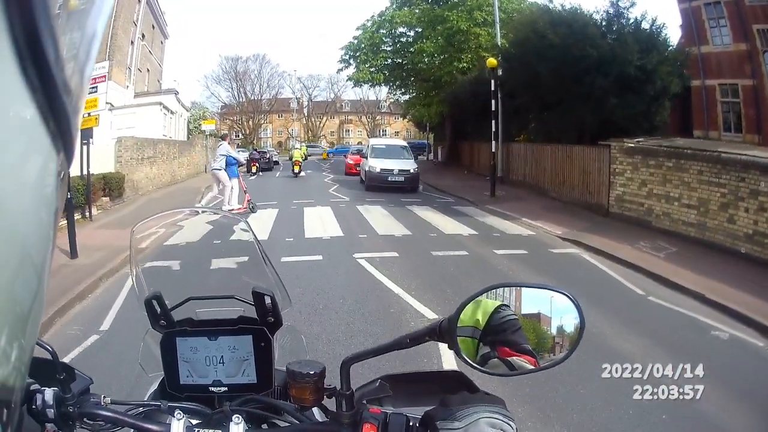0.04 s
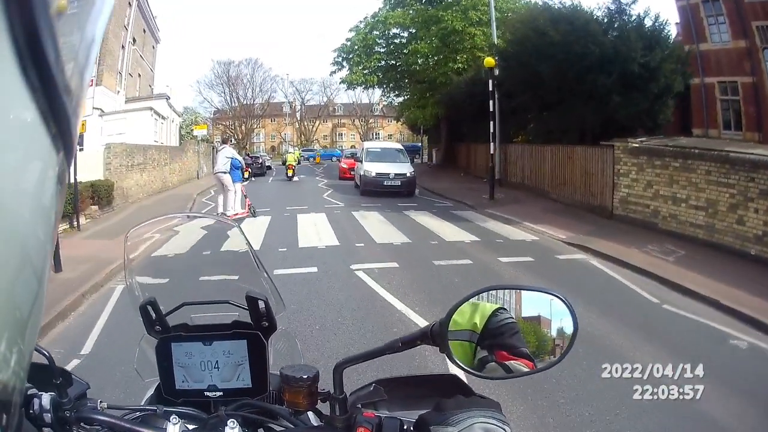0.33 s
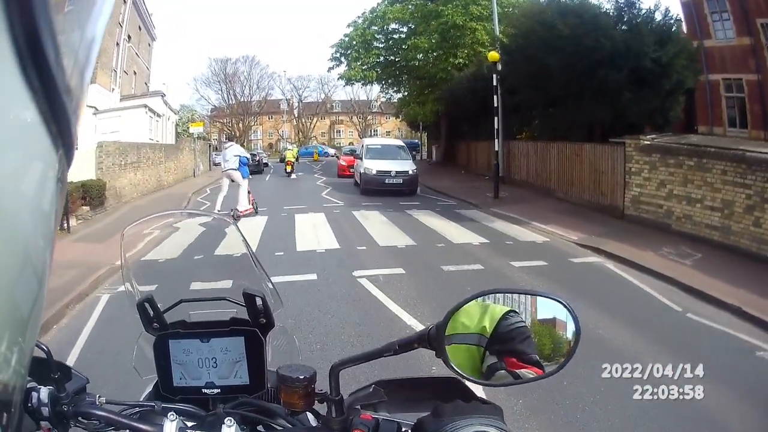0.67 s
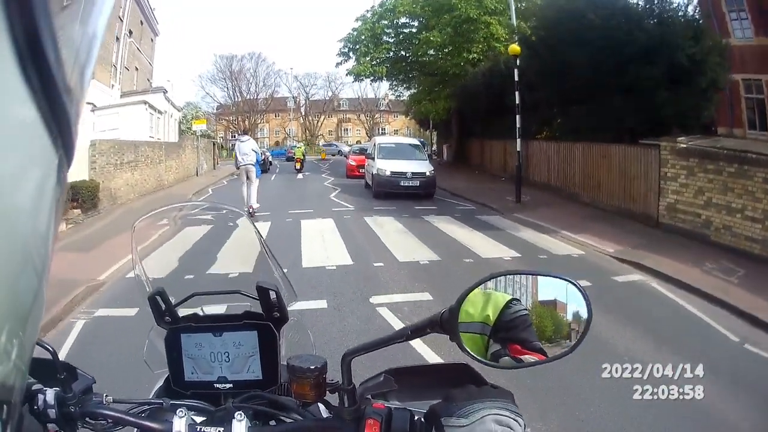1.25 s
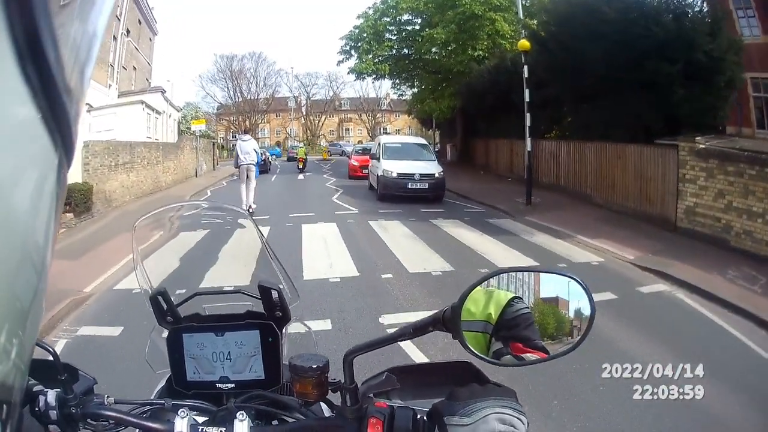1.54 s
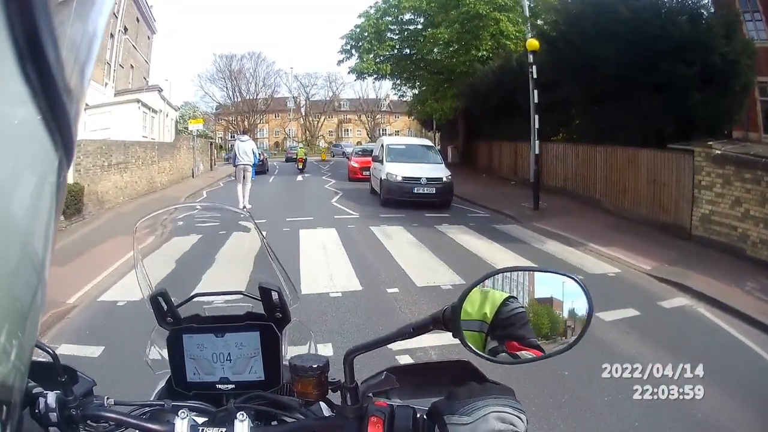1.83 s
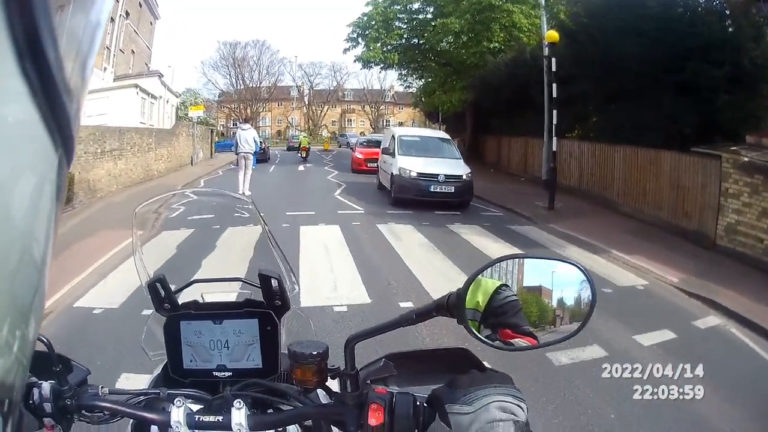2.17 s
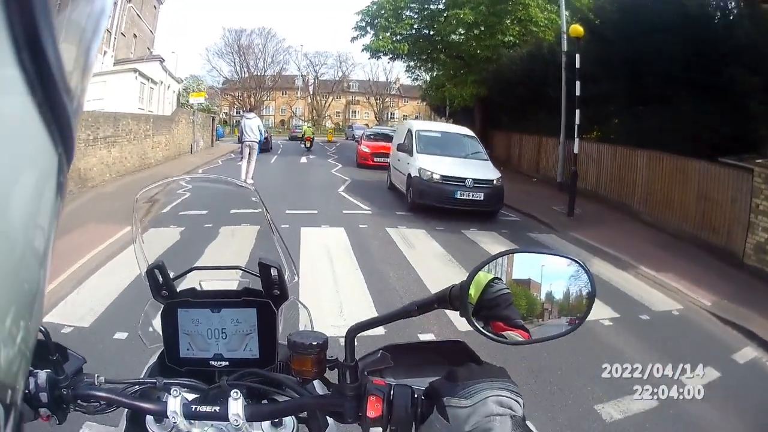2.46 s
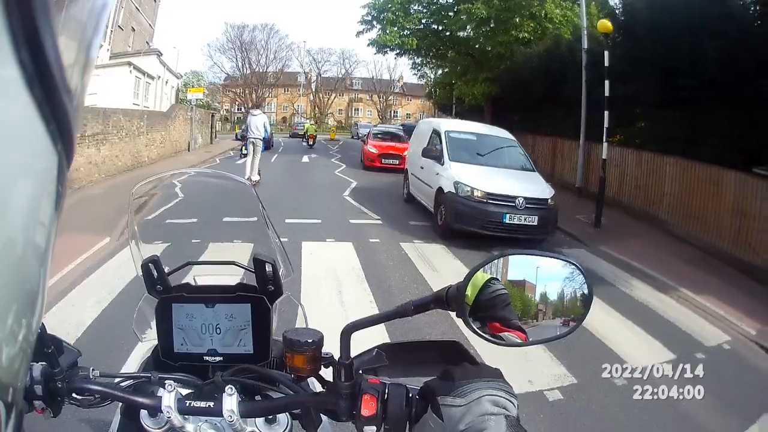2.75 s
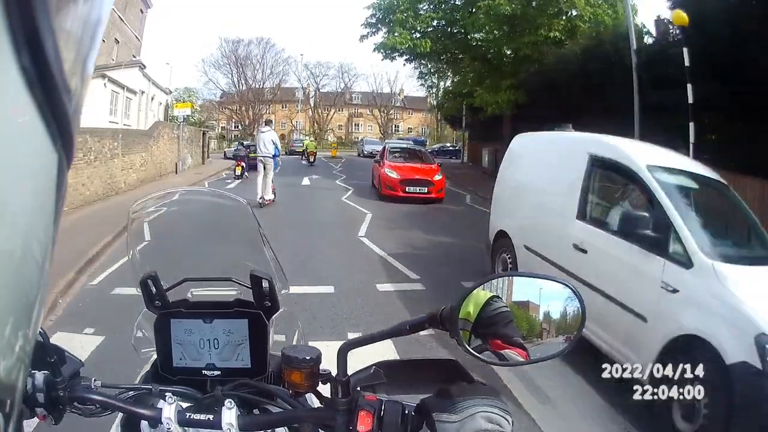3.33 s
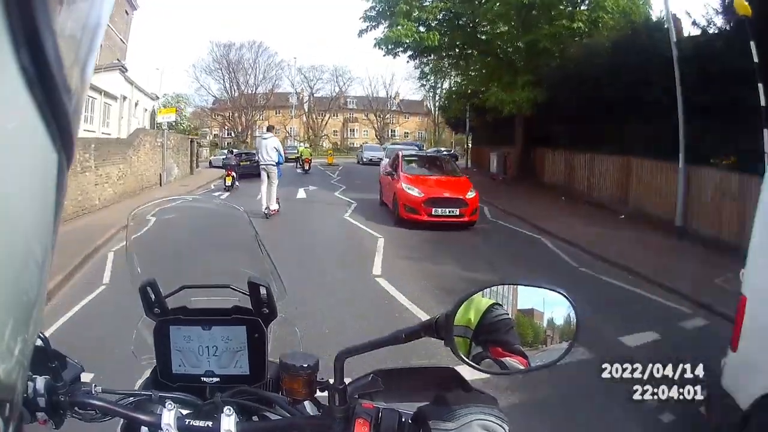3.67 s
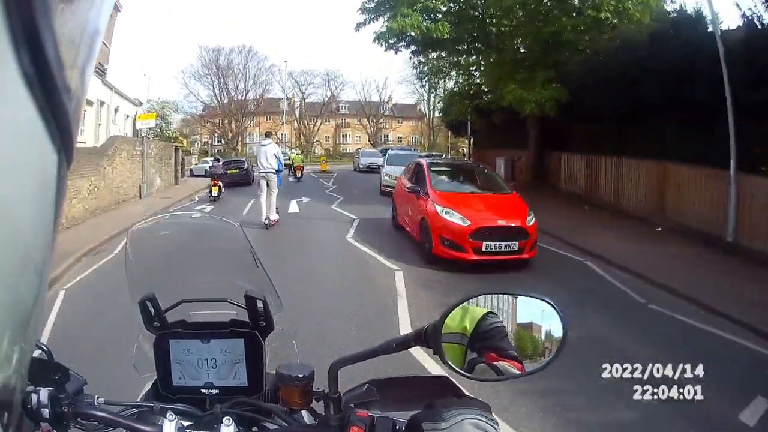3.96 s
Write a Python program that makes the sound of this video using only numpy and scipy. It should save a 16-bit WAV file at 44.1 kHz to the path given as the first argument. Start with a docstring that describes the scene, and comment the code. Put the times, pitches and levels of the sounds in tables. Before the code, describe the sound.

A motorcycle engine, heard from the rider's helmet, idles and then pulls away at about 0.5 seconds, throbbing, rattling and ticking. Its revs peak around 1.2 and 2.6 seconds and climb again at the end. A thin high whistle comes and goes until 2.3 seconds. Dull bumps knock under light, growing wind and road noise. From 3 seconds a van accelerates past with tyre roar and a faint rising whistle.

```python
"""A motorcycle ride through town

A three-cylinder motorcycle pulls away from idle, heard from the rider's helmet. Its uneven
firing throbs in the exhaust while gears whirr, valves tick and a thin whistle comes and goes.
Bumps knock the frame, over light wind and road noise. Near the end an oncoming van
accelerates past with tyre roar and a rising turbo whistle."""
import sys
import numpy as np
from scipy import signal
from scipy.fft import rfft, irfft, next_fast_len
from scipy.io import wavfile
from scipy.ndimage import uniform_filter1d, map_coordinates

SR = 44100
rng = np.random.default_rng(int(sys.argv[2]) if len(sys.argv) > 2 else 0)


def to_wav(sig):
    """Store sig (one row per channel, or 1-D mono) as 16-bit WAV at the path in sys.argv[1].

    Samples outside -1..1 are clipped; the rate is SR.
    """
    pcm = np.clip(np.atleast_2d(sig), -1, 1) * 32767
    pcm = np.round(pcm).astype(np.int16)
    wavfile.write(sys.argv[1], SR, pcm.T)  # frames by channels


N = 176400  # 4 seconds


def amp(db):
    """Turn decibels into a number to multiply by."""
    return 10 ** (np.asarray(db) / 20)


def unit(x):
    """Scale a signal to an average strength (rms) of 1."""
    return x / np.sqrt(np.mean(x ** 2) + 1e-20)


def along(points, hz):
    """Read a table of (pitch_hz, value) rows at any pitch, on a log scale."""
    pitches, values = np.transpose(points)
    return np.interp(np.log(hz + 1), np.log(pitches + 1), values)


def clock():
    """The time of each sample, in seconds."""
    return np.arange(N) / SR


def curves(rows):
    """Join timed rows with straight lines: one curve for each column after the time."""
    times, *columns = np.transpose(rows)
    return [np.interp(clock(), times, column) for column in columns]


def wobble(rate):
    """A smooth random curve through `rate` new values a second."""
    return map_coordinates(rng.standard_normal(N // 8), [clock() * rate + 2], mode="wrap")


def filtered(x, response):
    """Turn each frequency in x up or down by response(hz)."""
    size = next_fast_len(N + 8192)
    return irfft(rfft(x, size) * response(np.fft.rfftfreq(size, 1 / SR)), size)[:N]


def noise(colour):
    """Noise of strength 1; its colour table says which pitches are strong."""
    return unit(filtered(rng.standard_normal(N), lambda hz: amp(along(colour, hz))))


def fuzzy(turns, width_hz):
    """A blurred tone: a narrow band of noise that follows something spinning."""
    angle = 2 * np.pi * turns
    return unit(wobble(width_hz) * np.cos(angle) + wobble(width_hz) * np.sin(angle))


def bump(cycle, place, width):
    """One smooth pulse each cycle; place and width are fractions of the cycle."""
    offset = (cycle - place + .5) % 1 - .5
    return np.exp(-.5 * (offset / width) ** 2)


def patchy(x, depth_db):
    """Make narrow bands of pitch in x swell and fade at random."""
    bands = signal.stft(x, nperseg=1024)[2]
    swells = uniform_filter1d(rng.standard_normal(bands.shape), 3, axis=0)
    swells = uniform_filter1d(swells, 12, axis=1)
    return signal.istft(bands * amp(depth_db * unit(swells)), nperseg=1024)[1][:N]


# Loudness of the wind and road: time_s, level_db
ROAD_LEVEL = [(0, -35.5), (1, -33), (2, -33), (2.8, -30), (3.4, -27.5), (4, -26.5)]
# Colour of their rush: pitch_hz, gain_db
ROAD_COLOUR = [(20, 4), (100, -4), (280, -3.5), (400, -7), (520, -6.5), (640, -2), (790, 4), (1100, -3),
               (1450, -0.5), (1900, -11.5), (4000, -2.5), (8000, -29), (15000, -36)]

def road(gust_db=0.5):
    """Wind and tyre noise grow as the motorcycle gathers speed."""
    level_db, = curves(ROAD_LEVEL)
    return amp(level_db + gust_db * wobble(16)) * noise(ROAD_COLOUR)


# Wheels crossing markings and bumps: start_s, level_db
THUDS = [(.85, -34), (1.97, -32), (2.1, -30), (2.379, -33), (2.55, -35), (2.83, -34), (2.908, -31.5),
         (2.962, -31.5), (3.668, -33), (3.822, -33)]
# Colour of a thud: pitch_hz, gain_db
THUD_COLOUR = [(60, -27), (200, -13), (290, 0.5), (370, 0), (520, -10.5), (900, -45), (3000, -62)]

def thuds(rise_s=0.0044, decay_s=0.025):
    """Each bump gives the frame a short, dull knock."""
    level = np.zeros(N)
    for start_s, db in THUDS:
        age_s = np.maximum(clock() - start_s, 0)
        level += amp(db) * (1 - np.exp(-age_s / rise_s)) * np.exp(-age_s / decay_s)
    return level * noise(THUD_COLOUR)


# The van's engine: time_s, firing_hz, engine_db, turbo_hz, turbo_db
VAN_ENGINE = [(2.8, 49.92, -55, 10000, -85), (3.0, 55.74, -44, 10600, -65),
              (3.18, 66.96, -32.5, 11400, -55), (3.35, 74.75, -30, 13200, -45),
              (3.52, 77.1, -30.5, 14600, -51), (3.68, 75.7, -39, 14600, -61), (3.85, 73.5, -33, 14650, -48),
              (4, 72, -54, 14800, -51)]
# Its tones at 1, 2, 3... times the firing rate: gain_db
VAN_TONES = [1, 1, -11, -19, -20, -22, -14, -27]
# Colour of the van's roar: pitch_hz, gain_db
VAN_COLOUR = [(60, -22), (300, -9), (700, -6), (1300, -14), (2000, -21), (3500, 4), (5000, 5), (6300, 7.5),
              (7500, -4.5), (9000, -17.5), (12000, -18), (15000, -13)]

def van(closest_s=3.32, swell_s=0.15, roar_db=-20, clatter_db=2.5):
    """The van's roar swells as it comes near; its engine and turbo climb as it speeds up."""
    firing_hz, engine_db, turbo_hz, turbo_db = curves(VAN_ENGINE)
    phase = 2 * np.pi * np.cumsum(firing_hz) / SR
    nearness = 1 / np.hypot(1, (clock() - closest_s) / swell_s)
    roar = amp(roar_db + clatter_db * np.cos(phase)) * nearness ** 1.12 * noise(VAN_COLOUR)
    drone = sum(amp(db + 1.3 * wobble(9.1)) * np.sin(k * phase) for k, db in enumerate(VAN_TONES, 1))
    turbo = fuzzy(np.cumsum(turbo_hz) / SR, width_hz=250)
    return roar + amp(engine_db) * drone + amp(turbo_db) * turbo


# Swells of the whistle: start_s, end_s, level_db
WHISTLES = [(-.05, 0.237, -35.5), (.4, 0.797, -35.5), (1.153, 1.226, -32), (1.44, 1.733, -33),
            (1.945, 2.154, -33), (2.177, 2.31, -28.5)]

def whistle(cycle_hz, cycle, pitch_hz=6161, fade_s=0.031, rest_db=-48.5, waver_db=1.5, overtone_db=-66):
    """A thin whistle, perhaps a brushing brake, swells now and then; the idling engine shakes it."""
    t = clock()
    level = amp(rest_db)
    for start_s, end_s, db in WHISTLES:
        inside_s = np.minimum(t - start_s, end_s - t)
        level = level + amp(db) * np.clip(inside_s / fade_s + .5, 0, 1)
    # One shake for each turn of the crankshaft, weaker as the engine speeds up.
    shake_radians = 0.29 * (cycle_hz[0] / cycle_hz) ** 2 * (np.sin(4 * np.pi * cycle) + wobble(130))
    phase = 2 * np.pi * pitch_hz * t + shake_radians
    return level * amp(waver_db * wobble(38.8)) * np.sin(phase) + amp(overtone_db) * np.sin(2 * phase)


# Valve ticks in one engine cycle: place_fraction, gain_db
VALVE_TICKS = [(0.87, 3.5), (0.18, -6), (0.53, -2)]
# Loudness of the ticking: time_s, level_db
TICK_LEVEL = [(0, -35.5), (.8, -32.5), (1.3, -31), (2.3, -34), (2.5, -21), (2.8, -21), (2.95, -35),
              (4, -25)]
# Colour of a tick: pitch_hz, gain_db
TICK_COLOUR = [(300, -10), (1000, -22), (2500, -3), (4000, 7), (6000, 3), (8000, -8.5), (12000, -16.5),
               (15200, -8)]

def valves(cycle_hz, cycle, early_s=0.006, scatter_db=1):
    """The camshaft works the valves: three ticks a cycle, one louder than the others."""
    level_db, = curves(TICK_LEVEL)
    tick_cycle = cycle + early_s * cycle_hz
    bursts = sum(amp(db) * bump(tick_cycle, place, width=0.045) for place, db in VALVE_TICKS)
    return amp(level_db + scatter_db * wobble(300)) * bursts * noise(TICK_COLOUR)


# A coarse and a fine pair of gears: teeth_per_cycle, width_hz
GEARS = [(92, 210), (187, 460)]
# Loudness of each pair, following the load on its teeth: time_s, level_db
COARSE_LEVEL = [(0, -43), (.35, -47.5), (.6, -43), (.78, -40.5), (.9, -46), (.97, -35), (1.05, -41),
                (1.5, -37), (1.9, -39.5), (2.3, -41), (2.6, -36.5), (3.1, -37), (3.6, -37.5), (4, -37)]
FINE_LEVEL = [(0, -44), (.6, -51), (.78, -34), (.88, -46), (1.02, -33.5), (1.25, -38), (1.8, -35.5),
              (2.1, -36.5), (2.37, -29), (2.5, -34.5), (3, -37), (3.5, -32.5), (4, -33)]
# How the engine casing colours the whirr: pitch_hz, gain_db
GEAR_COLOUR = [(800, 1), (980, 4), (1150, 1.5), (1370, 1), (1460, -7), (1610, 7), (1740, -7.5),
               (1880, -7.5), (2100, 1), (2500, 1), (2790, 5), (3000, 2), (3250, 8), (3520, 2), (3720, 4.5),
               (3950, -7.5), (4200, 5)]

def gears(cycle):
    """Gear teeth meet so fast that they whirr, and the casing rings along."""
    whirr = np.zeros(N)
    for (teeth, width_hz), level_db in zip(GEARS, curves(COARSE_LEVEL) + curves(FINE_LEVEL)):
        whirr += amp(level_db) * fuzzy(teeth * cycle, width_hz)
    return filtered(whirr, lambda hz: amp(along(GEAR_COLOUR, hz)))


# Loudness of the rattle and of the fine sizzle: time_s, level_db
RATTLE_LEVEL = [(0, -31), (.4, -30.5), (.8, -27), (1.05, -24), (1.4, -24), (1.9, -25), (2.3, -24),
                (2.6, -21.5), (2.95, -22), (3.5, -20), (3.75, -20.5), (4, -22.5)]
SIZZLE_LEVEL = [(0, -64), (.5, -57), (.9, -50), (1.2, -41), (1.7, -45), (2.2, -41), (2.6, -38.5),
                (3.1, -39), (3.6, -46), (4, -42)]
# Colour of the rattling casing and of the sizzle: pitch_hz, gain_db
CASING_COLOUR = [(100, -27), (450, -23), (640, -10.5), (790, -11), (1000, -21), (1350, -17), (1580, -3.5),
                 (1830, -15.5), (2100, -8), (2480, -7), (2770, 0), (2950, -1.5), (3250, 2.5), (3550, 0),
                 (4100, -6), (4500, -3), (5000, -0.5), (5600, 2), (6250, -2), (6600, -11), (7100, -12.5),
                 (8000, -21), (10000, -29), (12800, -28.5), (15200, -21)]
SIZZLE_COLOUR = [(3000, -31), (7000, 5), (8000, 3), (9100, 4.5), (10000, 0.5), (11200, -0.5), (12800, -8),
                 (14000, -4), (15200, 3.5)]

def rattle(grit_db=0.97):
    """Chain and gears rattle in the casing, and the moving parts add a high sizzle."""
    rattle_db, = curves(RATTLE_LEVEL)
    sizzle_db, = curves(SIZZLE_LEVEL)
    clatter = unit(patchy(noise(CASING_COLOUR), depth_db=1.73) * amp(grit_db * wobble(700)))
    sizzle = patchy(noise(SIZZLE_COLOUR), depth_db=2.5) * amp(2.1 * wobble(90) + 1.1 * wobble(12))
    return amp(rattle_db) * clatter + amp(sizzle_db) * sizzle


# Pressure pulses in a cycle, three firings (+) and a gulp of air (-): place_fraction, signed_size
PULSES = [(.12, 1), (.5, 1), (.88, 1), (.78, -1)]
# Loudness of the exhaust: time_s, level_db
EXHAUST_LEVEL = [(0, -33), (.45, -31), (.8, -26.5), (1.0, -28), (1.3, -29.5), (2, -28.5), (2.65, -28.5),
                 (3.1, -29), (3.6, -29.5), (3.85, -28), (4, -27)]
# Its tones at 1, 2, 3... times the cycle rate: gain_db
EXHAUST_TONES = [-27, 2, -11.5, -5.5, 1.5, -16.5, -23, -3.5, -15, -11, -9, -20.5, -11.5, -22, -33, -10,
                 -27.5, -23, -25, -28, -22.5, -16, -42, -29]
# Colour of the pipe and of the puffs of gas: pitch_hz, gain_db
PIPE_COLOUR = [(20, -33), (29, -9), (37, -2), (55, 4), (72, 0.5), (88, 5.5), (103, -1.5), (118, -4.5),
               (150, -3), (180, 5), (210, 2.5), (240, -1.5), (295, -3), (380, -13.5), (600, -5)]
PUFF_COLOUR = [(20, -14), (50, -11), (100, 2), (200, 2), (300, -3.5), (420, -10), (650, -14), (1000, -32),
               (3000, -60)]

def exhaust(cycle_hz, cycle, pulsing, waver_db=0.95, puff_db=-47, puff_sharpness=1.5):
    """Uneven firing sends a stack of low tones through the pipe; each pulse also puffs."""
    places, sizes = np.transpose(PULSES)
    throb = np.zeros(N)
    for k, db in enumerate(EXHAUST_TONES, 1):
        # The pattern of pulses sets where each tone's wave starts.
        start_phase = np.angle(np.sum(sizes * np.exp(-2j * np.pi * k * places)))
        gain = amp(db + along(PIPE_COLOUR, k * cycle_hz) + waver_db * wobble(14))
        throb += gain * np.cos(2 * np.pi * k * cycle + start_phase)
    level_db, = curves(EXHAUST_LEVEL)
    puffs = unit(noise(PUFF_COLOUR) * np.exp(puff_sharpness * pulsing))
    return amp(level_db) * throb + amp(puff_db + level_db - level_db.mean()) * puffs


# Engine speed, where one cycle is two turns of the crankshaft: time_s, cycle_hz
ENGINE_SPEED = [(0.0, 10.64), (0.4, 10.72), (0.55, 11.98), (0.75, 14.67), (0.88, 14.88), (1.0, 17.35),
                (1.1, 19.75), (1.25, 20.3), (1.5, 19.68), (1.85, 17.99), (2.05, 18.18), (2.4, 21.16),
                (2.62, 23.18), (3.0, 21.5), (3.4, 18.9), (3.65, 18.1), (3.87, 19.39), (4.0, 22.27)]

def motorcycle(surge_db=0.35):
    """One engine speed drives the parts; the rattle and whirr surge with each pressure pulse."""
    cycle_hz, = curves(ENGINE_SPEED)
    cycle = np.cumsum(cycle_hz) / SR  # cycles run so far
    pulsing = sum(bump(cycle, place, width=0.085) for place, _ in PULSES)
    surge = amp(surge_db * unit(pulsing - pulsing.mean()))
    throb = exhaust(cycle_hz, cycle, pulsing)
    machinery = surge * (rattle() + gears(cycle))
    return throb + machinery + valves(cycle_hz, cycle) + whistle(cycle_hz, cycle)


def scene():
    """All the sounds meet at the helmet, the same on the left and right."""
    mono = motorcycle() + thuds() + road() + van()
    return np.array([mono, mono])


def record(dry):
    """Cut away the very highest treble."""
    top_hz = 15400
    return np.array([filtered(channel, lambda hz: hz < top_hz) for channel in dry])


dry = scene()
out = record(dry)
to_wav(out)
```